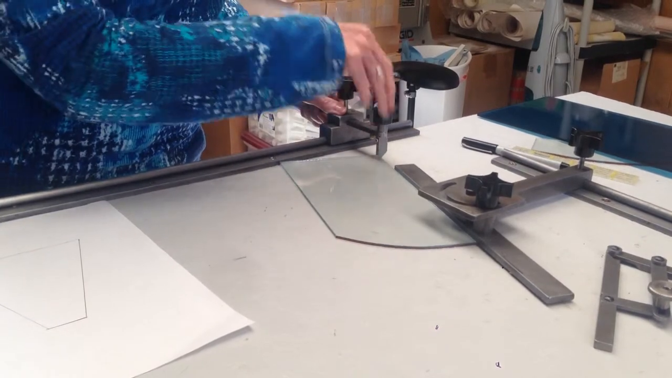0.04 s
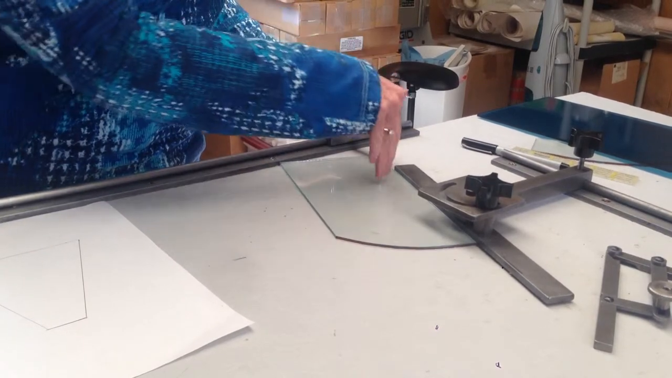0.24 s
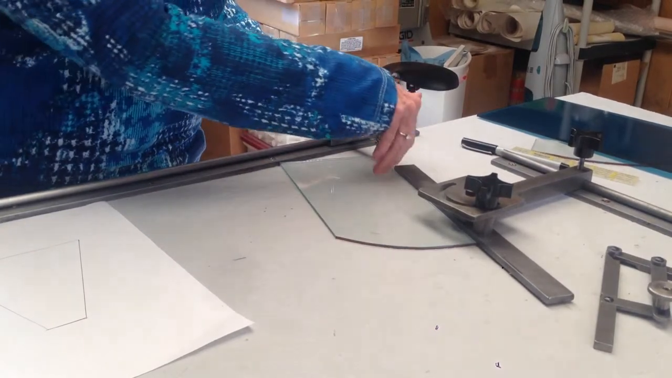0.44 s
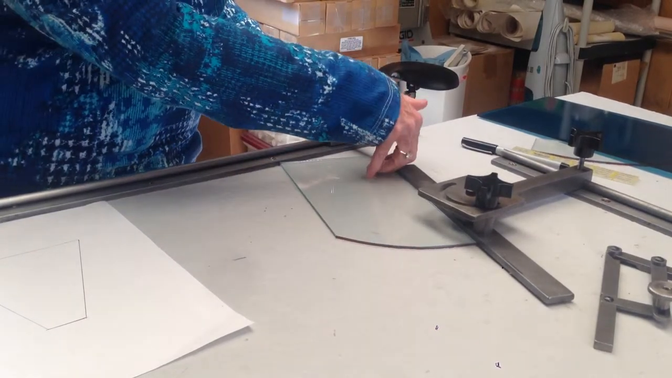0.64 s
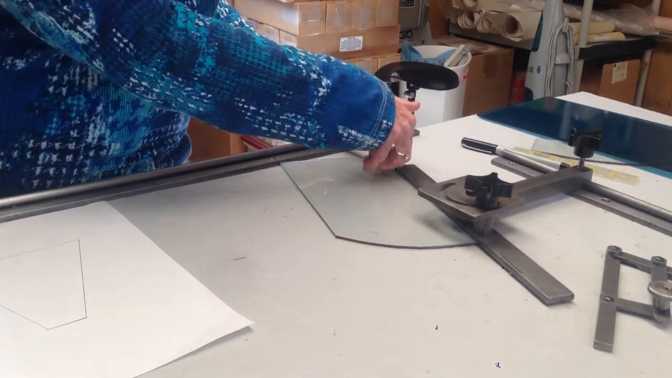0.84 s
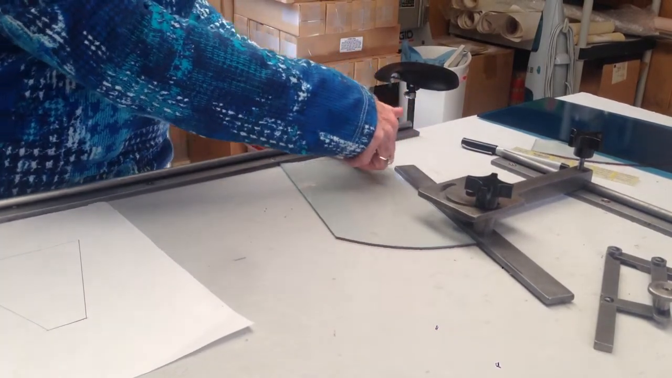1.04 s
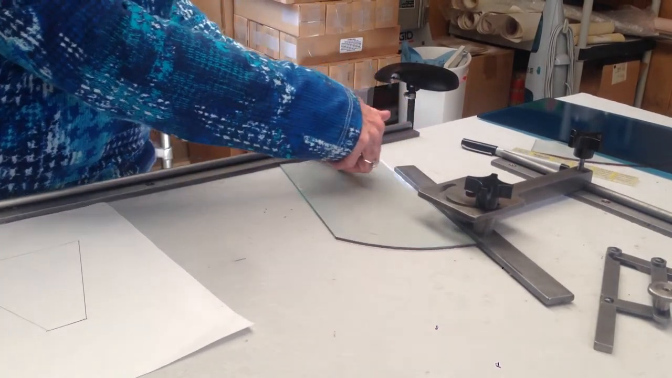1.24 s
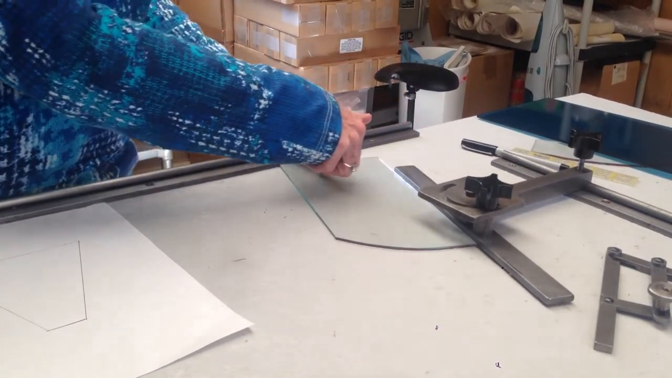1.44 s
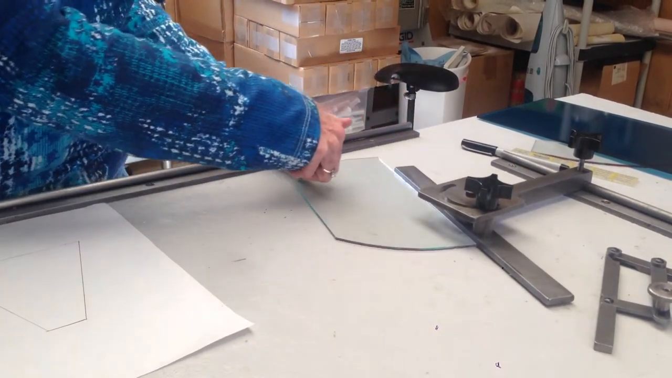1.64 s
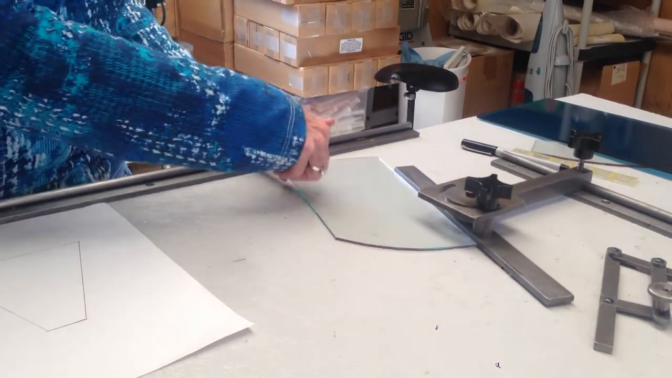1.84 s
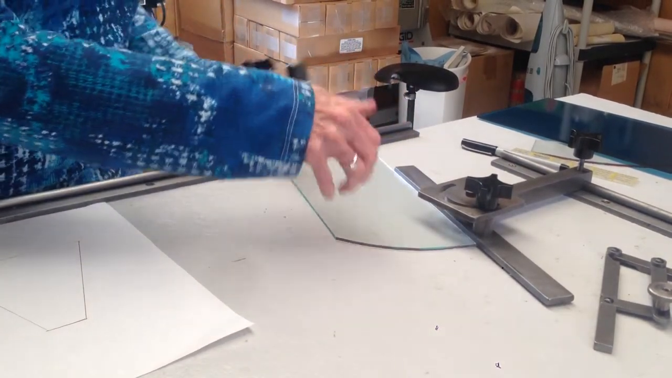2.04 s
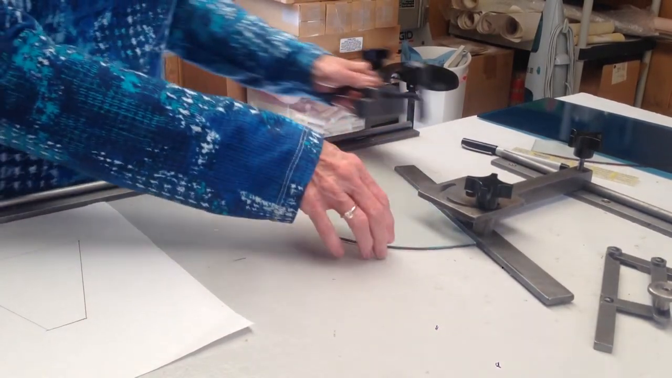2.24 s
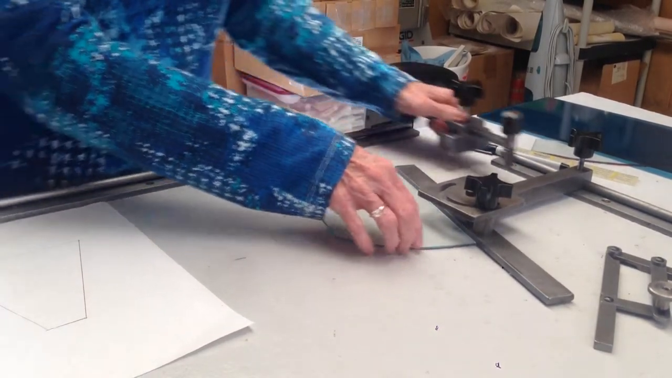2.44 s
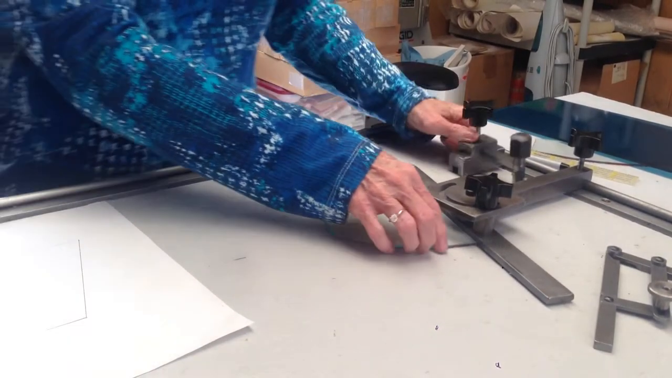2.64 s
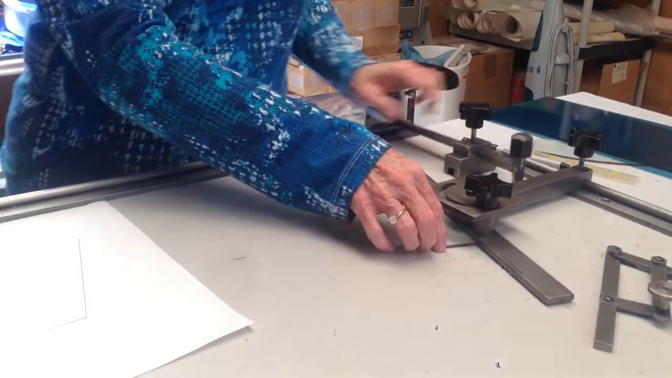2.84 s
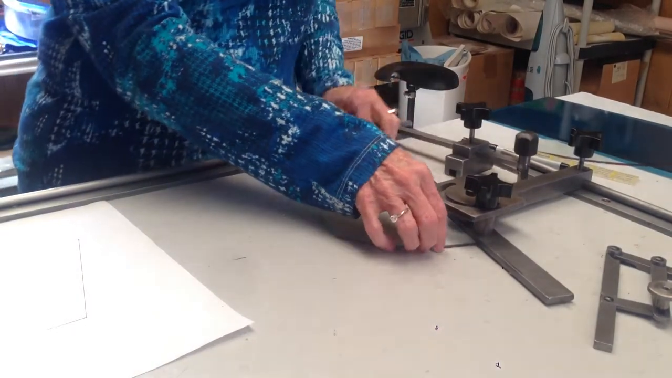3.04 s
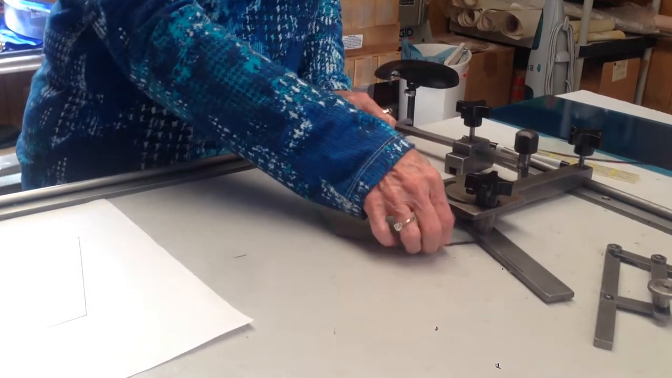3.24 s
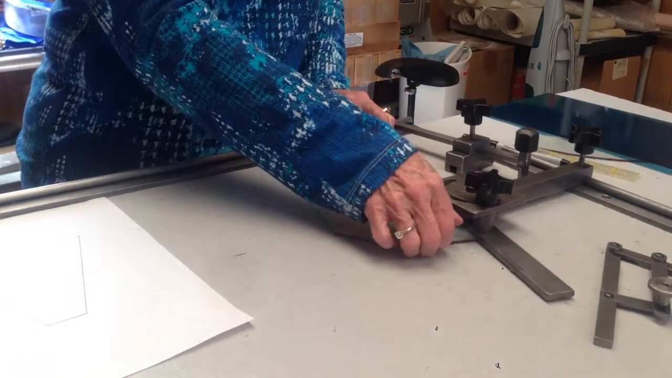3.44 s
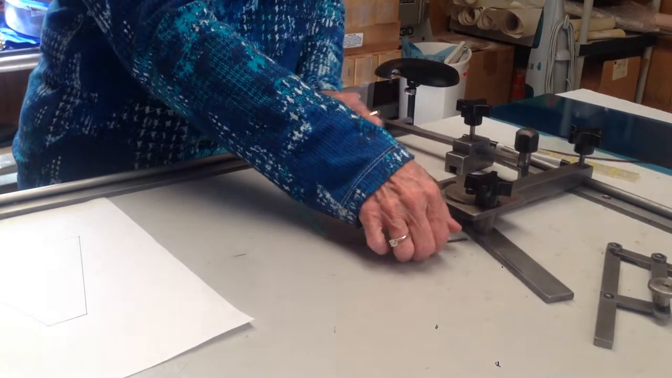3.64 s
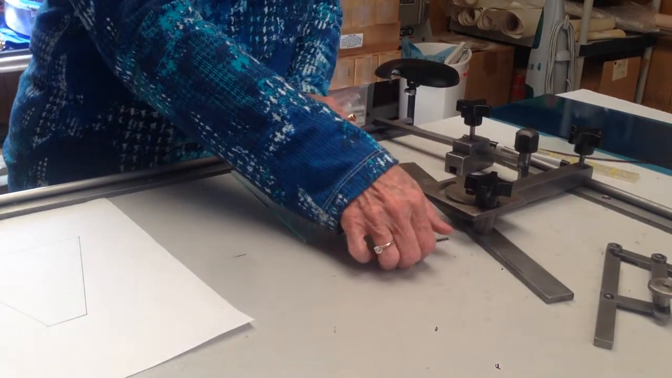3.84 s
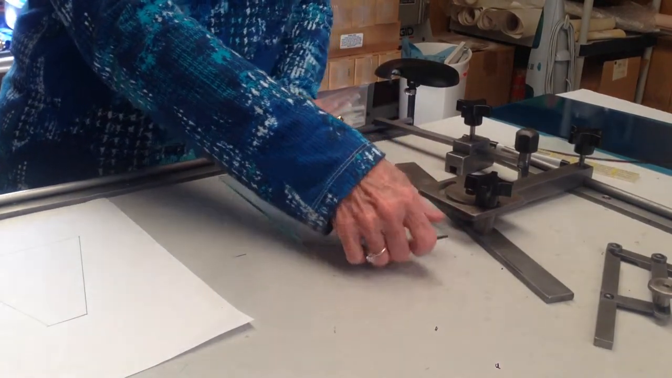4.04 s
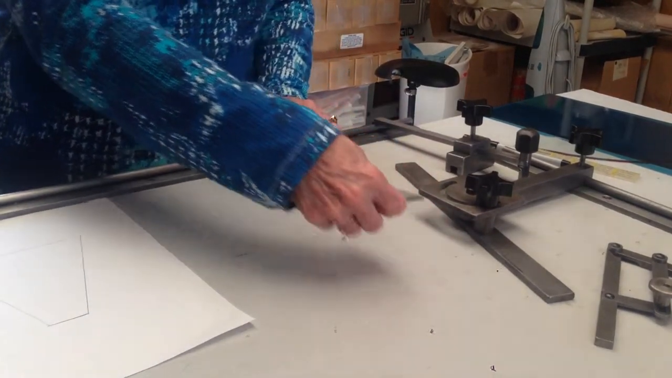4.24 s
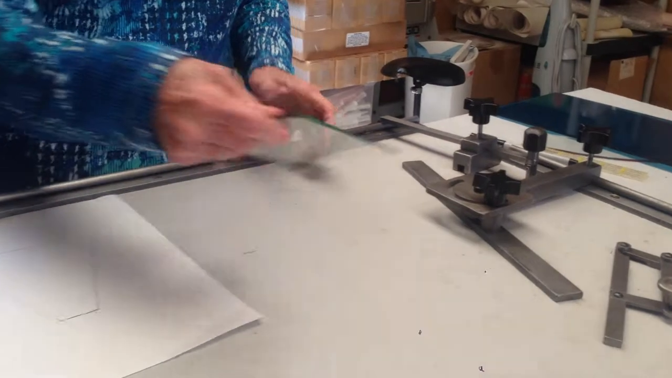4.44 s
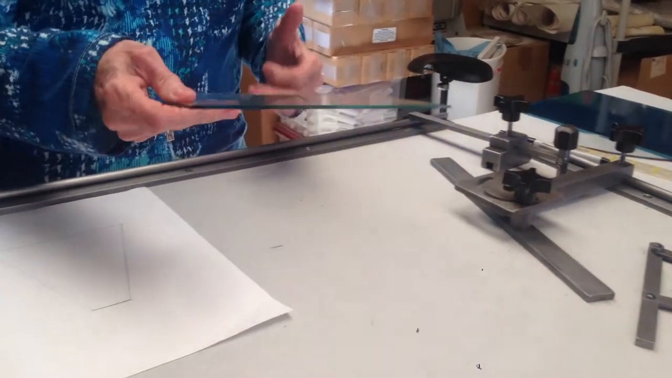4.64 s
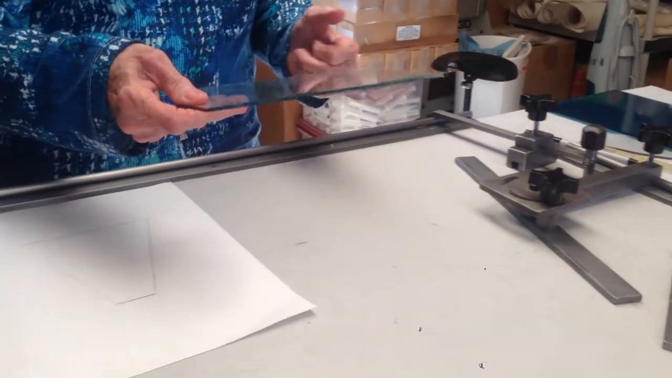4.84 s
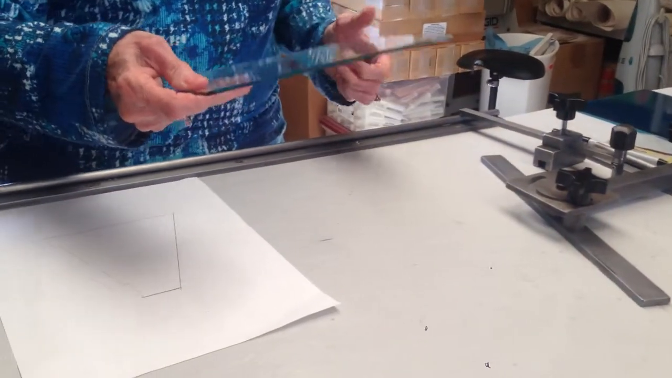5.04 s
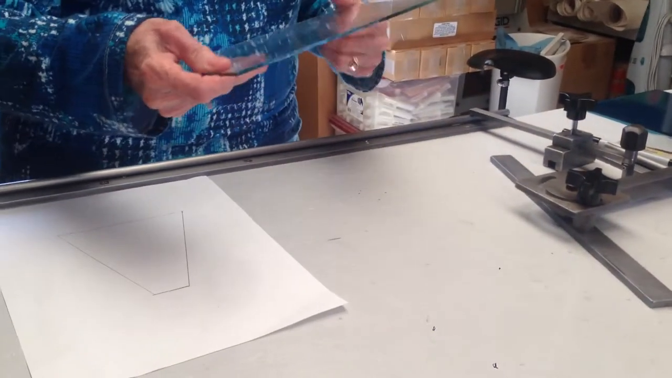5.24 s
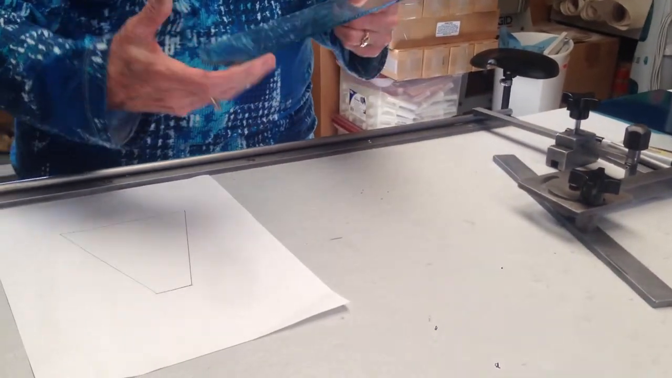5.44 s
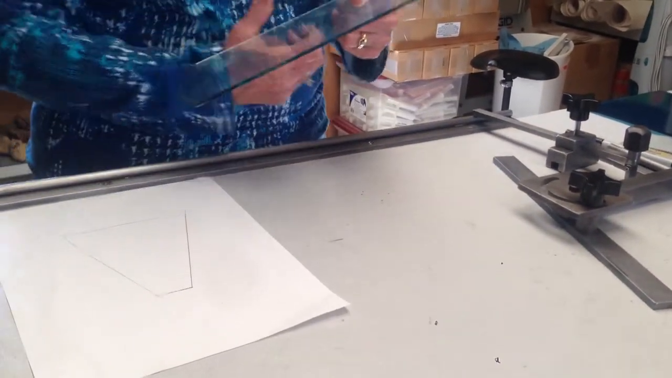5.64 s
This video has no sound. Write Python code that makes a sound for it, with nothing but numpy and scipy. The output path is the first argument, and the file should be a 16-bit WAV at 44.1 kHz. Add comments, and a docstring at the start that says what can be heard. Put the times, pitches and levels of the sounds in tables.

```python
"""A small workshop hums over still air; slight rubs and taps come first, from phase-modulated sine and coloured noise.
A glass cutter's wheel hisses across a sheet, as filtered random fractures, and drops off the edge with a sharp clack.
A steel carriage is set down on the bench, with decaying thumps, modes and noise; its hollow rail drones faintly.
The glass parts along the score, knocks on the top, slides and is lifted, clinking as a sum of damped modes.
The room answers the blows and the friction with a short diffuse tail."""
import sys
import numpy as np
from scipy import signal
from scipy.fft import rfft, irfft, next_fast_len
from scipy.io import wavfile
from scipy.ndimage import uniform_filter1d, map_coordinates

SR = 44100
rng = np.random.default_rng(int(sys.argv[2]) if len(sys.argv) > 2 else 0)


def dump(signal):
    """Clip the signal to [-1, 1] and save it as 16-bit WAV at the path in sys.argv[1]."""
    limited = np.clip(np.atleast_2d(signal).T, -1, 1)
    pcm = np.round(limited * 32767).astype(np.int16)
    wavfile.write(sys.argv[1], SR, pcm)


N = 251811
T = np.arange(int(0.5 * SR)) / SR  # time axis of one short sound (s)

# Modes of the sheet. Each row: frequency in Hz, level in dB, longest 60 dB decay time in seconds.
SHEET_MODES = [(1130, -17, 0.14), (1597, -10.5, .1), (3205, 2, .06), (3550, -13.5, 0.1), (4270, -2, 0.05),
               (4650, 2.5, .05), (5470, -7, 0.029), (6106, -12.5, .08), (7400, -7, 0.038),
               (8300, -11.5, .06)]
# Spectrum of a hard dry contact. Each row: frequency in Hz, relative level in dB.
TICK_SPECTRUM = [(200, -31), (800, -3.5), (2000, -9), (4200, -3.5), (5200, -4), (6500, -6), (8500, -5),
                 (10500, -8), (12000, -17), (15500, -29)]
# Spectrum of hard sliding. Each row: frequency in Hz, relative level in dB.
SCRAPE_SPECTRUM = [(710, -27), (1200, -1), (2160, -12.5), (3150, -0.5), (3760, -2), (4520, 0.5),
                   (5220, -10), (5780, -2), (6340, -7.5), (7790, -8), (14000, -15.5)]
# Spectrum of soft sliding. Each row: frequency in Hz, relative level in dB.
RUB_SPECTRUM = [(150, -23.5), (280, -0.5), (450, -0.5), (620, -2.5), (740, -4), (880, -4.5), (1400, -11.5),
                (2300, -8.5), (3200, -21), (5000, -46.5)]

# The wheel's one stroke across the sheet (s)
BITE_S, EDGE_S = 0.935, 1.803


def amp(db):
    """Level law: decibels to amplitude gain."""
    return 10 ** (np.asarray(db) / 20)


def unit(x):
    """Power normalisation: scale to rms 1."""
    return x / np.sqrt(np.mean(x ** 2) + 1e-20)


def crest(x, size=88):
    """Short-time power: scale so that the loudest two milliseconds have rms 1."""
    power = uniform_filter1d(x ** 2, size)
    return x / np.sqrt(power.max() + 1e-20)


def along(points, hz):
    """Logarithmic frequency scale: interpolate (Hz, value) points along it."""
    f, v = np.transpose(points)
    return np.interp(np.log(hz + 1), np.log(f + 1), v)


def wobble(rate):
    """Slow random modulation: a smooth curve through rate random knots a second."""
    knots = rng.standard_normal(int(N * rate / SR) + 4)
    return map_coordinates(knots, [np.arange(N) * rate / SR])


def colour(x, points, size=4096):
    """Minimum-phase filtering: a causal response of the given (Hz, dB) shape, by way of the cepstrum."""
    gain = amp(along(points, np.fft.rfftfreq(size, 1 / SR)))
    cepstrum = irfft(np.log(gain + 1e-6))
    # Folding the cepstrum onto positive time makes the response causal
    cepstrum[1:size // 2] *= 2
    cepstrum[size // 2 + 1:] = 0
    response = irfft(np.exp(rfft(cepstrum)))
    return signal.fftconvolve(x, response)[:len(x)]


def add(track, s, sound):
    """Superposition: mix a sound in at time s (seconds)."""
    part = track[round(s * SR):][:len(sound)]
    part += sound[:len(part)]


def burst(spectrum, t60, push=0):
    """Impact excitation: one push and a puff of exponentially dying noise, coloured."""
    force = rng.standard_normal(len(T)) * amp(-60 * T / t60)
    force[0] += push
    return crest(colour(force, spectrum))


def dense_ring(decays):
    """High modal density: countless modes act as noise, each band dying at its own speed."""
    hz, t, bands = signal.stft(rng.standard_normal(len(T)), SR, nperseg=256)
    decay = amp(-60 * t / along(decays, hz)[:, None])
    return signal.istft(bands * decay, SR, nperseg=256)[1][:len(T)]


def ring(modes, longest, tilt_db=0, scatter_db=-1.5, beat_hz=0):
    """Modal superposition: damped sines, each struck at a random new strength; split modes beat."""
    hz, db, t60 = np.transpose(modes)[:, :, None]
    level = db + tilt_db * np.log2(hz / 1000) + scatter_db * rng.standard_normal(hz.shape)
    sign = rng.choice([-1, 1], hz.shape)
    beating = sign * np.cos(2 * np.pi * beat_hz * rng.random(hz.shape) * T)
    envelope = amp(level - 60 * T / np.minimum(t60, longest))
    return crest(np.sum(beating * envelope * np.sin(2 * np.pi * hz * T), axis=0))


def thump(hz):
    """Heavy damping: a dead push that lasts only a few cycles."""
    attack = 1 - np.exp(-T / 0.0028)
    return crest(np.sin(2 * np.pi * hz * T) * amp(-60 * T / 0.041) * attack)


def grains(rate, spread_db):
    """Shot noise: tiny random impulses of uneven size, rate a second on average."""
    hits = rng.random(N) < rate / SR
    signed = hits * rng.standard_normal(N)
    return unit(signed * amp(spread_db * rng.standard_normal(N)))


def travelling(x, depth_db, order=4, count=30):
    """Moving excitation: the contact passes nodes of the sheet, so groups of modes swell and fade."""
    bands = signal.stft(x, nperseg=512)[2]
    field = uniform_filter1d(rng.standard_normal(bands.shape), order, 0)
    field = uniform_filter1d(field, count, 1)
    return unit(signal.istft(bands * amp(depth_db * unit(field)), nperseg=512)[1][:N])


def gliding(x, hz, width_hz):
    """Time-varying resonance: shift its centre hz down to zero, low-pass, and shift it back."""
    carrier = np.exp(2j * np.pi * np.cumsum(hz) / SR)
    pole = np.exp(-np.pi * width_hz / SR)
    low_passed = signal.lfilter([1], [1, -2 * pole, pole ** 2], x / carrier)
    return unit(np.real(carrier * low_passed))


def swell(s, length):
    """Friction envelope: the slide gathers, peaks at s and dies away; length spans its half-gain points."""
    rise_share, shape = 0.46, 1.6  # part of the length spent swelling; shape 1 = peaked, 2 = rounded
    t = np.arange(N) / SR - s
    side = length * np.where(t < 0, rise_share, 1 - rise_share)
    return 0.5 ** (np.abs(t / side) ** shape)


def workshop():
    """Broadband noise and phase modulation: still air and the wavering hum of a fan."""
    # Spectrum of the still air. Each row: frequency in Hz, relative level in dB.
    air_spectrum = [(20, -19), (35, -10.5), (58, -6.5), (90, -11.5), (130, -4), (170, -10.5), (300, -22),
                    (450, -23), (750, -27.5), (1300, -30.5), (2200, -28.5), (4150, -24), (9000, -26.5),
                    (15500, -28)]
    hum_hz = 129.3
    phase = 2 * np.pi * hum_hz * np.arange(N) / SR + 0.89 * wobble(3.6)
    hum = np.sin(phase) * amp(2.8 * wobble(16))
    air = colour(rng.standard_normal(N), air_spectrum)
    return amp(-65.5) * unit(air) + amp(-70.5) * unit(hum)


def handling():
    """Sliding friction: lying glass scrapes over grit and rings faintly; hands and sleeves rub."""
    # Slides on the bench. Each row: strongest moment in seconds, length in seconds,
    # scrape gain in dB, soft rub gain in dB (each ahead of the fixed mix below).
    slides = [(0.008, 0.056, -88, -67), (0.918, 0.24, -65.5, -68.5), (1.75, 0.43, -60, -55.5),
              (2.008, 0.028, -55, -49.5), (3.231, 0.075, -59, -63), (3.336, 0.13, -65.5, -61.5),
              (3.525, 0.024, -49, -63), (3.583, 0.05, -56.5, -56.5), (3.664, 0.041, -47, -49.5),
              (3.756, 0.11, -58, -62.5), (3.93, .12, -63, -61), (4.064, 0.066, -60.5, -71),
              (4.12, 0.021, -59.5, -71), (4.223, 0.067, -64, -67)]
    grit = grains(rate=650, spread_db=1.5) * amp(3.1 * wobble(45))
    rung = signal.fftconvolve(grit, ring(SHEET_MODES, longest=0.0284))[:N]
    lying = travelling(rung, depth_db=0, count=12)
    scrape = amp(-2.0) * unit(colour(grit, SCRAPE_SPECTRUM)) + amp(-8) * lying
    cloth = unit(colour(grains(rate=2500, spread_db=1), RUB_SPECTRUM))
    out = np.zeros(N)
    for s, length, scrape_db, rub_db in slides:
        out += swell(s, length) * (amp(scrape_db) * scrape + amp(rub_db - 3) * cloth)
    return out


def knocks():
    """Contact damping: glass lying on the bench gives a hollow tap, with weaker rebounds when it rocks."""
    # Taps of the sheet on the bench top. Each row: start in seconds, level in dB, number of contacts.
    taps = [(.384, -53, 1), (1.822, -38, 1), (1.832, -30.5, 1), (1.912, -39, 1), (1.974, -50, 1),
            (2.02, -45.5, 1), (2.676, -41, 1), (3.594, -43.5, 1), (3.734, -38.5, 2), (3.769, -40, 1),
            (3.872, -35.5, 4)]
    # Spectrum of a tap. Each row: frequency in Hz, relative level in dB.
    knock_spectrum = [(80, -21.5), (250, -11), (420, 3.5), (650, -3), (900, -18), (1350, -12),
                      (1900, -36.5), (5000, -44)]
    rebound_s, rebound_loss_db = 0.018, 5.5  # between successive contacts
    out = np.zeros(N)
    for s, db, contacts in taps:
        for k in range(round(contacts)):
            tap = burst(knock_spectrum, t60=0.0092, push=12)
            tap = tap + amp(-13.0) * burst(knock_spectrum, t60=0.18)
            add(out, s + k * rebound_s, amp(db - k * rebound_loss_db) * tap)
    return out


def ticks():
    """Short impulse, broad spectrum: hard dry contacts, each with a longer noisy after-ring of the same colour."""
    # Hard contacts. Each row: start in seconds, level in dB,
    # after-ring in dB relative to the contact (ahead of a fixed 15 dB cut).
    contacts = [(.385, -57, 13.5), (0.932, -57, 4), (.941, -51, 13), (2.6746, -24, -18),
                (2.7594, -30.5, -3.5), (2.934, -58, 12.5), (3.107, -55.5, -7), (3.575, -50, 6.5),
                (3.7348, -43, 4.5), (3.769, -51, -7), (4, -50, -1)]
    out = np.zeros(N)
    for s, db, body_db in contacts:
        hit = burst(TICK_SPECTRUM, t60=0.012, push=5.4)
        body = amp(body_db - 15) * burst(TICK_SPECTRUM, t60=0.17)
        add(out, s, amp(db) * (hit + body))
    return out


def stroke(fade=0.011):
    """Contact force: seconds since the bite, contact gain, and pressure (dB) that settles and slackens each turn."""
    # The hand leans in: level missing at first (dB), settling time (s), further growth (dB per s)
    lean_db, lean_s, grow_db_per_s = 9.5, 0.1, 2
    # Slackening: first time (s), turns per s at that time, their growth (per s each s)
    slack_s, turns_per_s, speed_up = 0.985, 11.1, 7.4
    slack_db, slack_length_s = 4.5, 0.014  # depth once the hand has settled; length at the first turn rate
    t = np.arange(N) / SR
    age = np.clip(t - BITE_S, 0, EDGE_S - BITE_S)
    contact = np.clip(np.minimum(t - BITE_S, EDGE_S - t) / fade + 1, 0, 1)
    since = t - slack_s
    turns = turns_per_s * since + speed_up * since ** 2 / 2
    off_turn = turns - np.round(turns)
    slack = np.exp(-(2 * off_turn / (turns_per_s * slack_length_s)) ** 2)
    light = np.exp(-age / lean_s)
    # The slackening is deeper while the hand is still light
    pressure_db = grow_db_per_s * age - lean_db * light - slack_db * slack * (1 + 2 * light)
    return age, contact, pressure_db


def wheel():
    """Brittle fracture as shot noise: the wheel crushes a line of tiny cracks; its bite flutters and skips."""
    # Spectra of the fractures' hiss, the holder's rasp and the sheet's grinding.
    # Each row: frequency in Hz, relative level in dB.
    hiss_spectrum = [(1200, -28.5), (2600, -20), (3200, -9), (5000, -5.5), (5700, -4.5), (6700, 0.5),
                     (8400, -6.5), (9800, -2), (10800, -6.5), (11300, -10), (11900, -3.5), (13400, -10),
                     (14200, -19), (15500, -12.5)]
    rasp_spectrum = [(2000, -31), (2700, -17.5), (3050, -3), (3600, -8.5), (4500, 0.5), (5200, 5.5),
                     (6000, -17), (8000, -36)]
    grind_spectrum = [(100, -27.5), (220, -15), (330, -14.5), (520, -6.5), (800, -12.5), (1150, -12.5),
                      (1480, -1.5), (1750, -4), (2050, 3.5), (2400, -0.5), (2800, -1.5), (3400, -25.5)]
    # Strongest bending resonance: at the edge (Hz), far inside (Hz), halfway after (s)
    bend_edge_hz, bend_inside_hz, bend_fall_s = 4100, 1330, 0.033
    age, contact, pressure_db = stroke()
    way = age / (EDGE_S - BITE_S)  # share of the stroke done

    skips = np.maximum(wobble(110) - 1, 0)
    flutter = 0.69 * wobble(220) + 0.54 * wobble(35)
    fractures = grains(rate=8700, spread_db=-0.8) * amp(flutter - 2.2 * skips)
    sheet = travelling(fractures, depth_db=3.5, order=4, count=24)

    hiss = amp(-43.5 + pressure_db) * unit(colour(sheet, hiss_spectrum))

    # The rasp swells by 2 dB on livelier parts of the sheet, 0.41 s apart, and follows pressure more steeply
    lively_db = 2 * np.cos(2 * np.pi * (BITE_S + age - 1.154) / 0.41)
    rasp = amp(-47.6 + 1.5 * pressure_db + lively_db) * unit(colour(sheet, rasp_spectrum))

    # The sheet gives up to 13 dB more towards its middle
    middle = np.sin(np.pi * way ** 1.6)
    grind = amp(-66 + 13 * middle) * unit(colour(sheet, grind_spectrum))

    # The bending resonance falls as the wheel runs in and is lost towards the far edge
    centre = bend_inside_hz + (bend_edge_hz - bend_inside_hz) / (1 + age / bend_fall_s)
    centre = centre * (1 + 0.033 * wobble(90))
    bend = amp(-62.5 + pressure_db / 2 - 23 * way ** 6) * gliding(sheet, centre, width_hz=260)
    return contact * (hiss + rasp + grind + bend)


def bench():
    """Modal response to a load: the top booms, its frame gives, and steel guides lying on it clatter."""
    # Weight landing on the bench. Each row: start in seconds, level in dB, thump pitch in Hz,
    # boom in dB relative, clatter in dB relative (thump and clatter each lose a further 1.5 dB).
    thuds = [(.94, -47, 247, -13, -14), (1.818, -37.5, 118, -25, -7), (2.311, -58.5, 160, -7, -16.5),
             (2.6767, -31, 398, 0, 0), (2.701, -32.5, 209, -8.5, -22), (2.75, -34, 160, -11, -17),
             (2.767, -33.5, 225, -11, -15.5), (2.969, -36.5, 107, -10.5, -24.5),
             (3.599, -34.5, 213, -14, -27), (4.115, -54, 131, -13, -20)]
    # Modes of the bench top. Each row: frequency in Hz, level in dB, 60 dB decay time in seconds.
    bench_modes = [(110.1, -1.5, .33), (214.9, 7, 0.21), (261, -10, 0.52), (364, -5.5, 0.2)]
    # Spectrum of the clattering guides. Each row: frequency in Hz, relative level in dB.
    clatter_spectrum = [(190, -29), (330, -5), (626, -4), (725, -7.5), (796, -6), (909, -3.5), (1250, -5.5),
                        (1750, -13), (2140, -11), (2680, -17), (2860, -17.5), (4050, -18), (6460, -16.5),
                        (8000, -28), (10400, -54.5), (17600, -120)]
    frame_hz, frame_lag_s, frame_db = 72, 0.005, -9.5  # the frame gives just after each thud
    out = np.zeros(N)
    for s, db, hz, boom_db, clatter_db in thuds:
        boom = amp(boom_db) * ring(bench_modes, longest=0.63)
        clatter = amp(clatter_db - 1.5) * burst(clatter_spectrum, t60=0.3)
        add(out, s, amp(db) * (amp(-1.5) * thump(hz) + boom + clatter))
        add(out, s + frame_lag_s, amp(db + frame_db) * thump(frame_hz))
    return out


def cutter():
    """Frequency-dependent damping: the steel head drops off; head and rail ring on, most high tones dying first."""
    # The head dropping and rattling. Each row: start in seconds, crack level in dB,
    # ring in dB relative to the crack (ahead of the fixed cuts below).
    clacks = [(1.808, -26.5, -3.5), (1.8137, -15, -3), (1.8147, -20.5, -4), (1.8231, -19, 0.5),
              (1.9135, -45, -3), (2.007, -52, -6.5), (2.036, -55, -10)]
    # Tones of the steel head and rail. Each row: frequency in Hz, level in dB.
    steel_tones = [(536, -57.5), (2541, -57), (3085, -59), (3171, -55.5), (3720, -55), (4350, -68),
                   (4845, -54.5), (5469, -61.5), (5852, -60), (6067, -65.5), (6546, -56.5), (6858, -64),
                   (7558, -54), (8247, -67.5), (8425, -65.5), (8732, -66), (8952, -66.5), (9125, -57.5),
                   (10304, -60.5), (11407, -58), (12016, -65.5), (14519, -67)]
    # Decay of the steel. Each row: frequency in Hz, 60 dB decay time in seconds.
    steel_decay = [(200, 0.31), (3000, 0.36), (7000, 0.28), (14000, 0.24)]
    # Spectra of the crack and of the rattle. Each row: frequency in Hz, relative level in dB.
    crack_spectrum = [(120, -40.5), (200, -3.5), (641, -1.5), (1680, -9.5), (5390, 0.5), (6710, -7.5),
                      (7620, -1), (11800, -8.5), (12700, -15), (14700, -9), (15500, -24)]
    rattle_spectrum = [(88, -40.5), (150, -8), (314, -17.5), (381, -5), (453, -17.5), (519, 1), (827, -4),
                       (948, -5.5), (1660, -11.5), (1870, -15.5), (3160, -4), (4390, -22.5), (5440, -6.5),
                       (9000, -17), (15500, -23)]
    out = np.zeros(N)
    modes = [(hz, db, along(steel_decay, hz)) for hz, db in steel_tones]
    for s, db, ring_db in clacks:
        rattle = crest(colour(dense_ring(steel_decay), rattle_spectrum))
        tones = ring(modes, longest=0.45, tilt_db=2.0, beat_hz=21)
        body = amp(-13.5) * rattle + amp(-15) * tones
        add(out, s, amp(db) * (burst(crack_spectrum, t60=0.016) + amp(ring_db) * body))
    return out


def carriage():
    """Tube resonance under rolling: the moving carriage makes its hollow rail drone faintly."""
    rolling = grains(rate=2400, spread_db=5)
    drone = gliding(rolling, np.full(N, 750), width_hz=99)
    return amp(-65.5) * swell(3.245, length=0.18) * drone


def snap():
    """Sudden release of strain: the crack runs along the score in an instant and the sheet rings briefly."""
    # The glass parting. Each row: start in seconds, level in dB.
    partings = [(3.5063, -31.5)]
    # Spectrum of the running crack. Each row: frequency in Hz, relative level in dB.
    split_spectrum = [(350, -25), (600, -6.5), (1130, -25), (1560, -52), (1830, -14), (3140, -4.5),
                      (3500, -14), (4400, -2), (5040, -14.5), (5460, -1.5), (6510, -11.5), (7450, -10),
                      (15000, -34)]
    out = np.zeros(N)
    for s, db in partings:
        split = amp(-2.0) * burst(split_spectrum, t60=0.011)
        add(out, s, amp(db) * (split + amp(-8) * ring(SHEET_MODES, longest=0.039)))
    return out


def fingers():
    """Friction-driven resonance: fingers rub the lifted piece; each grip leaves one mode free to sing."""
    # Rubs on the lifted piece. Each row: strongest moment in seconds, length in seconds, scrape gain in dB,
    # soft rub gain in dB (both ahead of fixed cuts), excited mode in Hz, its level in dB.
    rubs = [(4.377, 0.12, -59, -63, 3080, -67), (4.439, 0.036, -55, -54.5, 1470, -48.5),
            (4.684, 0.43, -66, -64.5, 2660, -79), (4.932, 0.16, -65, -65.5, 2682, -79),
            (5.305, .06, -65.5, -79, 3380, -74)]
    out = np.zeros(N)
    for s, length, scrape_db, rub_db, hz, sing_db in rubs:
        skin = grains(rate=1500, spread_db=3.0) * amp(1.8 * wobble(45))
        # The skin damps the mode, which widens it
        sing = amp(sing_db) * gliding(skin, np.full(N, hz), width_hz=65)
        scrape = amp(scrape_db - 4.5) * unit(colour(skin, SCRAPE_SPECTRUM))
        rub = amp(rub_db - 2) * unit(colour(skin, RUB_SPECTRUM))
        out += swell(s, length) * (scrape + rub + sing)
    return out


def clinks():
    """Free-boundary modes: the lifted glass rings when touched, and its rim when a finger ring ticks it."""
    # Touches of the lifted piece. Each row: start in seconds, level in dB, tilt in dB per octave.
    touches = [(4.443, -29.5, 2), (4.842, -56.5, -23), (4.915, -59.5, 12)]
    # Ticks of a finger ring on the glass. Each row: start in seconds, level in dB.
    pings = [(5.565, -60), (5.575, -54.5)]
    # Modes of the lifted piece and of its ticked rim.
    # Each row: frequency in Hz, level in dB, longest 60 dB decay time in seconds.
    pane_modes = [(1123, -12, .46), (1470, 5, .04), (1474, -22, .35), (2292, -21, .33), (2650, -34, .5),
                  (3097, -26, .2), (3347, -25, .5), (3976, -23, .13), (4574, -20, .22), (5843, -22, .11),
                  (7460, -20, .05)]
    rim_modes = [(1947, -9.5, .25), (2980, -13, .25), (3480, -7, 0.13), (3900, -5.5, .25), (5250, 5, 0.074),
                 (6740, -3, .2), (8484, -2, 0.09), (11700, -6, 0.053)]
    # Spectrum of the touch itself. Each row: frequency in Hz, relative level in dB.
    clink_spectrum = [(290, -49), (500, -29), (1470, -0.5), (1780, -18), (2330, -10.5), (2790, -28),
                      (3370, -11.5), (3660, -15), (4610, -6), (5010, -18), (7540, -25.5), (8640, -29),
                      (13000, -38)]
    out = np.zeros(N)
    for s, db, tilt_db in touches:
        tones = amp(-2.5) * ring(pane_modes, longest=0.6, tilt_db=tilt_db, beat_hz=7.2)
        add(out, s, amp(db) * (tones + amp(-6.0) * burst(clink_spectrum, t60=0.038)))
    for s, db in pings:
        tones = amp(1.5) * ring(rim_modes, longest=0.15)
        add(out, s, amp(db) * (tones + amp(-6) * burst(TICK_SPECTRUM, t60=0.057)))
    return out


def room(x):
    """Diffuse reverberation: convolution with the cluttered room's short, dense tail."""
    # Decay of the room. Each row: frequency in Hz, 60 dB decay time in seconds.
    room_decay = [(100, 0.71), (600, 0.081), (3000, 0.47), (7000, 0.27), (14000, 0.27)]
    tail = dense_ring(room_decay) * (1 - np.exp(-T / 0.0012))
    return signal.fftconvolve(x, tail / np.linalg.norm(tail))[:N]


def scene():
    """Linear superposition: blows and friction on the bench, their reverberation and the background."""
    blows = cutter() + ticks() + snap() + bench() + knocks() + clinks()
    friction = wheel() + handling() + fingers() + carriage()
    direct = blows + friction
    echo = amp(-10.0) * room(blows) + amp(-7.0) * room(friction)
    return (direct + echo + workshop())[None]


def record(dry):
    """Band limiting: the microphone sheds the deep bass and keeps nothing above its upper limit."""
    top_hz = 15600
    size = next_fast_len(N + SR // 2)
    hz = np.fft.rfftfreq(size, 1 / SR)
    bass_gain = amp(along([(20, -20.5), (45, -2.5), (70, 0)], hz))
    return irfft(rfft(dry, size) * bass_gain * (hz < top_hz), size)[:, :N]


dry = scene()
out = record(dry)
dump(out)
```